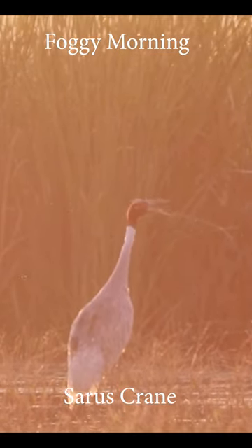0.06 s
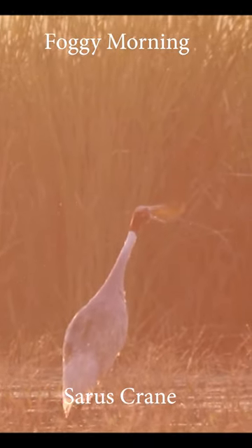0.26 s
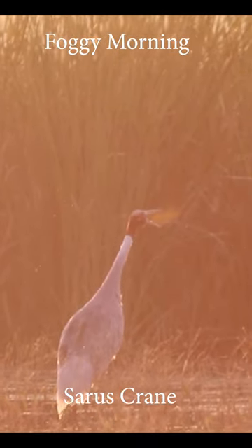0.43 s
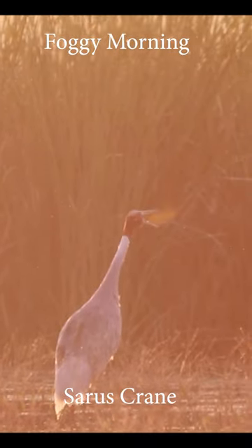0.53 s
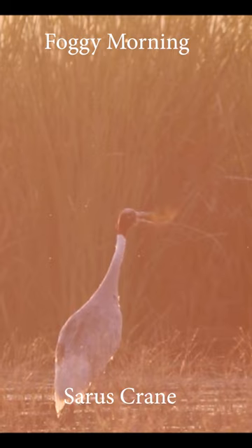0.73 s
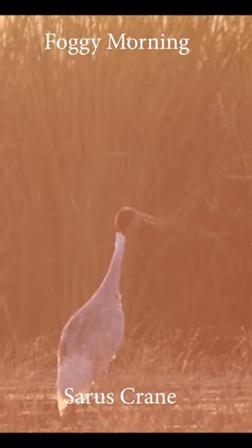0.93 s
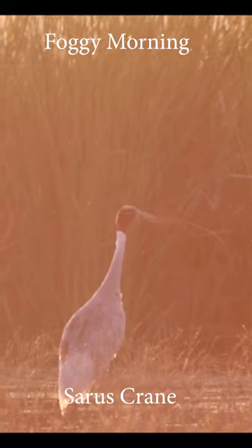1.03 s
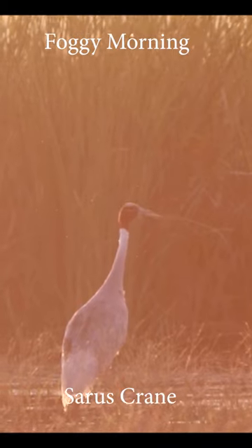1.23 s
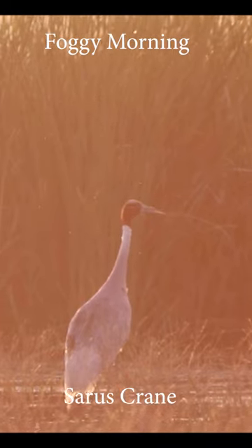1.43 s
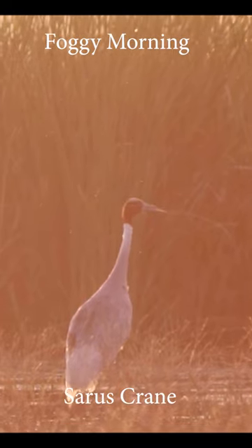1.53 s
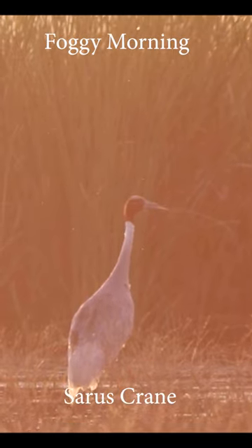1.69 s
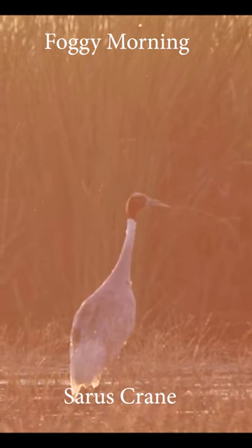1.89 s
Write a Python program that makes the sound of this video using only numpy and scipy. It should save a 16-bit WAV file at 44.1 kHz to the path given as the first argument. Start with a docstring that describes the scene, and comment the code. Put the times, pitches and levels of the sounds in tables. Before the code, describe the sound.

A crane gives one loud, harsh trumpeting call that ends in a rattle over a marsh.

```python
"""A low, steady rumble hangs over a marsh, and faint dry ticks come and go. A crane calls once:
a bugling note starts hoarse, scoops up and holds clean as its voice box rings. Then the voice breaks
into a harsh rattle, quick bursts of sharp snaps that sink in pitch and die away. Reeds, water and the
far bank scatter the call. As the echo fades, an insect chirps and small birds whistle far off."""
import sys
import numpy as np
from scipy import signal
from scipy.fft import rfft, irfft
from scipy.io import wavfile
from scipy.ndimage import uniform_filter1d

SR = 44100
rng = np.random.default_rng(int(sys.argv[2]) if len(sys.argv) > 2 else 0)


def generate_wav(signal):
    """Clip the signal to [-1, 1] and save it as 16-bit WAV at the path in sys.argv[1]."""
    frames = np.transpose(np.atleast_2d(signal))
    scaled = np.clip(frames, -1, 1) * 32767
    pcm = np.round(scaled).astype(np.int16)
    wavfile.write(sys.argv[1], SR, pcm)


N = 85995


def amp(db):
    """Turn decibels into a gain."""
    return 10 ** (np.asarray(db) / 20)


def unit(x):
    """Scale a signal to an average power of 1."""
    return x / np.sqrt(np.mean(x ** 2))


def curve(table, t):
    """Read a table's columns at times t, gliding from row to row."""
    rows = np.array(table, float)
    return [np.interp(t, rows[:, 0], column) for column in rows.T[1:]]


def level_at(table, hz):
    """Read a table's level in dB at hz, gliding evenly through each octave."""
    rows = np.array(table, float)
    return np.interp(np.log(np.maximum(hz, 1)), np.log(rows[:, 0]), rows[:, 1])


def shape(x, db_at):
    """Turn each frequency up or down by db_at(Hz)."""
    size = 2 ** 18
    hz = np.arange(size // 2 + 1) * SR / size
    cepstrum = irfft(np.log(amp(db_at(hz))))
    # make the filter ring after a sound, never before it
    cepstrum[1:size // 2] *= 2
    cepstrum[size // 2 + 1:] = 0
    return irfft(rfft(x, size) * np.exp(rfft(cepstrum)))[:N]


def colour(x, table):
    """Filter a sound by a table of frequencies and levels."""
    return shape(x, lambda hz: level_at(table, hz))


def wobble(rate):
    """A smooth random wobble of size 1 that turns about rate times a second."""
    hold = max(int(SR / rate), 2)
    steps = np.repeat(rng.standard_normal(N // hold + 1), hold)
    return unit(uniform_filter1d(steps, hold)[:N])


def gate(t, start, end, attack, release):
    """Fade in, hold until end, then die away; all in seconds."""
    return np.clip((t - start) / attack, 0, 1) * np.exp(-np.maximum(t - end, 0) / release)


def add_click(out, at, gain, size=8):
    """Place a click at an exact time, even between samples."""
    samples = np.arange(-size, size + 1) + int(at * SR)
    offset = samples - at * SR
    out[samples] += gain * np.sinc(offset) * np.sinc(offset / (size + 1))


# The background noise. Each row: frequency in Hz, relative level in dB.
AIR_COLOUR = [(25, -19), (60, -7), (130, -2), (200, -1), (270, 3), (400, -9), (700, -8), (1050, -13.5),
              (1400, -9), (1750, -9.5), (1930, -22), (2350, -11), (3100, -20), (3550, -19), (4500, -22),
              (5600, -29), (7500, -27.5), (10000, -31.5), (15500, -36)]

def air():
    """Distant rumble and soft hiss, wavering a little."""
    return amp(-48 + .3 * wobble(14.05)) * unit(colour(rng.standard_normal(N), AIR_COLOUR))


CHIRP_HZ, CHIRP_PULSES_PER_S = 6420, 54.3
# The insect's chirps. Each row: start in seconds, length in seconds.
INSECT_CHIRPS = [(1.082, .055), (1.235, 0.055), (1.393, .075)]

def insect(t):
    """An insect chirps in short runs of high, nearly pure pulses."""
    pulses = 0
    for at, length in INSECT_CHIRPS:
        beat = np.sin(np.pi * CHIRP_PULSES_PER_S * (t - at)) ** 2
        pulses += beat * gate(t, at, at + length, .004, .004)
    tone = np.sin(2 * np.pi * CHIRP_HZ * t + .5 * wobble(200))
    return amp(-60.5 + 2 * wobble(39.63)) * pulses * tone


# One list for each whistle. Each row: time in seconds, pitch in Hz, level in dB.
BIRD_WHISTLES = [
    [(1.205, 6400, -69), (1.235, 5890, -56), (1.25, 5050, -67), (1.268, 4500, -64)],
    [(1.503, 4960, -64), (1.518, 5090, -57), (1.535, 5060, -67)],
]

def small_birds(t):
    """Small birds give thin, short whistles, far off."""
    out = 0
    for whistle in BIRD_WHISTLES:
        hz, db = curve(whistle, t)
        phase = 2 * np.pi * np.cumsum(hz * (1 + .015 * wobble(400))) / SR
        out += amp(db) * np.sin(phase) * gate(t, whistle[0][0], whistle[-1][0], .008, .0067)
    return out


# The ticks. Each row: start in seconds, relative level in dB.
DRY_TICKS = [(0.045, -35), (0.1343, -41), (0.8814, -38.5), (1.0477, -41), (1.1105, -41.5), (1.1728, -38),
             (1.1911, -38.5), (1.4325, -41.5), (1.441, -39.5), (1.4875, -40), (1.6533, -39.5), (1.884, -39),
             (1.899, -41)]
# The tone of a tick. Each row: frequency in Hz, boost or cut in dB.
TICK_COLOUR = [(500, -12), (1500, 4), (4200, -1.5), (5800, -8.5), (7800, -4.5), (10500, -21), (15000, -28)]

def ticks(t):
    """Tiny bursts of noise make faint dry ticks, some in pairs."""
    level = sum(amp(db + 1) * gate(t, at, at + .0018, .0005, .0022) for at, db in DRY_TICKS)
    return colour(level * rng.standard_normal(N), TICK_COLOUR)


# The tone of the near and the far echoes. Each row: frequency in Hz, boost or cut in dB.
REED_COLOUR = [(400, -1), (1200, 2), (4000, 1), (7500, -5.5), (11000, 1)]
BANK_COLOUR = [(300, -2), (900, 5), (1300, 4.5), (2000, -4), (3000, -0.5), (6000, -8.5), (12000, -26)]

def echoes(call, t, tone, delay_s, fade_s):
    """Reeds, water or the far bank scatter the call into a cloud that drops 60 dB in fade_s."""
    tail = rng.standard_normal(N) * (t > delay_s) * np.exp(-np.log(1000) * t / fade_s)
    cloud = signal.fftconvolve(call, tail / np.linalg.norm(tail))[:N]
    return colour(cloud, tone)


# The tone under the rattle. Each row: time in seconds, pitch in Hz, level in dB,
# level of the octave above in dB, depth of the throb from 0 to 1.
SINKING_TONE = [(0.499, 1315, -26, -41, 0), (0.515, 1255, -27, -43, 0.5), (0.535, 1190, -33.5, -47, 0.4),
                (0.565, 1179, -30, -45, 0.63), (0.605, 1151, -31, -41, 0.62), (0.645, 1095, -33, -44, 0.73),
                (0.695, 1040, -39, -48, 0.79), (0.745, 880, -46, -49, 0.98), (0.80, 723, -46.5, -45, 0.94),
                (0.845, 572, -50.5, -55, 1)]

def undertone(t):
    """The note's lowest tone sinks on through the rattle; the deeper it throbs, the rougher it gets."""
    hz, db, octave_db, depth = curve(SINKING_TONE, t)
    start, end = SINKING_TONE[0][0], SINKING_TONE[-1][0]
    phase = 2 * np.pi * np.cumsum(hz * (1 + .028 * depth ** 2 * wobble(200))) / SR
    tone = amp(db) * np.sin(phase) + amp(octave_db) * np.sin(2 * phase)
    flutter_hz = curve(RATTLE_BURSTS, t)[0]  # shared with the rattle below
    cycles = np.cumsum(flutter_hz * (t > start)) / SR
    throb = 1 + depth * np.cos(2 * np.pi * (cycles - .41))  # peaks 0.41 of the way into each cycle
    return throb * tone * gate(t, start, end, .006, .0076)


SLOW_START, SPEED_UP_S = .36, .0023  # a burst starts with wider gaps between snaps, then tightens
KNOCK_FROM_S, KNOCK_GROW_S = .714, .093
# The rattle. Each row: time in seconds, bursts per second, snaps per second reached in a burst,
# share of the cycle that the airway is open, relative level in dB.
RATTLE_BURSTS = [(0.4988, 80.6, 1150, 0.23, -2), (0.511, 76, 1229, .42, 0), (0.545, 76.4, 1297, .48, -1),
                 (0.62, 76.4, 1315, .47, -2.5), (0.69, 76, 1159, .46, -2.5), (0.712, 70.5, 1113, .40, -4.5),
                 (0.765, 68.7, 973, 0.34, -5.5), (0.797, 67, 876, 0.38, -9.5), (0.826, 62, 755, 0.2, -14.5)]
# A snap through the windpipe and open bill, and the soft knock left as the pressure runs out.
# Each row: frequency in Hz, boost or cut in dB.
SNAP_COLOUR = [(300, -51), (620, -17), (1030, -4.5), (1400, -4), (1800, 0), (3000, -5.5), (5000, -0.5),
               (6300, 2), (8200, -2), (10000, -9.5), (12000, -23.5), (15500, -39)]
KNOCK_COLOUR = [(300, -42), (650, -5), (1100, -13.5), (1600, 0), (2200, -7), (2700, -3.5), (4000, -14),
                (10000, -27)]

def rattle():
    """A slow flutter opens and shuts the airway; while it is open the membranes snap ever faster."""
    snaps, knocks = np.zeros(N), np.zeros(N)
    start = RATTLE_BURSTS[0][0]
    while start < RATTLE_BURSTS[-1][0] + .004:
        flutter_hz, snap_hz, open_share, db = curve(RATTLE_BURSTS, start)
        snap_hz *= 1 + .015 * rng.standard_normal()
        knock_gain = amp(db / 2) * np.clip((start - KNOCK_FROM_S) / KNOCK_GROW_S, 0, 1)
        age, length = 0, open_share / flutter_hz
        for late, loud in rng.standard_normal((12, 2)):
            if age > length:
                break
            edge_db = -4.5 * (2 * age / length - 1) ** 2  # softer at both ends of the burst
            add_click(snaps, start + age, -amp(db + edge_db + .5 * loud))
            add_click(knocks, start + age, -knock_gain)
            age += (1 + SLOW_START * np.exp(-age / SPEED_UP_S) + .026 * late) / snap_hz
        start += 1 / flutter_hz
    return amp(5.5) * colour(snaps, SNAP_COLOUR) + amp(-1.5) * colour(knocks, KNOCK_COLOUR)


HOARSE_S, RASP_S = .032, .017  # how quickly the rough start settles
DIP_HZ, DIP_WIDTH_HZ, DIP_DB, BILL_OPEN_S = 6780, 850, -13, .313  # treble dip until the bill is open
# The note. Each row: time in seconds, pitch in Hz, relative level in dB, brightness in dB per octave.
BUGLE_NOTE = [(0.231, 945, -33, 1.5), (0.240, 1092, -34.5, 0), (0.245, 1156, -28.5, -1.5),
              (0.255, 1261, -27, -0.5), (0.274, 1288, -25.5, 1.5), (0.281, 1394, -27, 1.5),
              (0.298, 1400, -27, 1), (0.316, 1420, -25.5, -0.5), (0.340, 1430, -24, -0.3),
              (0.368, 1407, -27.5, 0), (0.392, 1373, -28.5, 0), (0.445, 1345, -28, -2),
              (0.499, 1328, -25.5, -3)]
# The note's harmonics, and the air hissing through it. Each row: frequency in Hz, relative level in dB.
HARMONIC_COLOUR = [(1000, 1.5), (1400, 0.5), (2700, -4.5), (4100, -6), (5600, -12), (6400, -10.5),
                   (7100, -8.5), (8400, -12), (9400, -33.5), (11500, -38), (15000, -46)]
RASP_COLOUR = [(400, -10), (800, -9), (1500, 2), (3000, -5), (5000, 3), (6500, -1), (7700, -4), (9500, -8),
               (12000, -30), (15500, -28)]

def bugle(t):
    """The voice box rings: hoarse for a moment, then a clean stack of harmonics (pitch multiples)."""
    hz, db, brightness = curve(BUGLE_NOTE, t)
    start, end = BUGLE_NOTE[0][0], BUGLE_NOTE[-1][0]
    age = np.maximum(t - start, 0)
    hoarse = np.exp(-age / HOARSE_S)
    hz *= 1 + .0007 * wobble(350) + .018 * hoarse * wobble(600)
    phase = 2 * np.pi * np.cumsum(hz) / SR
    bill_shut = np.clip((BILL_OPEN_S - t) / .021, 0, 1)
    voice = 0
    for k in range(1, 12):
        harmonic_db = level_at(HARMONIC_COLOUR, k * hz) + brightness * np.log2(k)
        flicker_db = (.2 * k + 4 * hoarse) * wobble(180)
        dip_db = DIP_DB * bill_shut * np.exp(-((k * hz - DIP_HZ) / DIP_WIDTH_HZ) ** 2)
        voice -= amp(harmonic_db + flicker_db + dip_db) * np.cos(k * phase)
    puffs = rng.standard_normal(N) * (1 + np.cos(phase))  # one puff of air for each vibration
    rasp = unit(colour(puffs, RASP_COLOUR))
    voice += rasp * (amp(-27) + amp(-8) * np.exp(-age / RASP_S))
    level = amp(db + 2.5 * hoarse * wobble(300))
    return voice * level * gate(t, start, end, attack=.0017, release=.0068)


def scene():
    """The crane's call, its echoes near and far, and the marsh around it."""
    t = np.arange(N) / SR
    call = bugle(t) + rattle() + undertone(t)
    near = amp(-8.5) * echoes(call, t, REED_COLOUR, delay_s=.00072, fade_s=.08)
    far = amp(-20) * echoes(call, t, BANK_COLOUR, delay_s=.014, fade_s=1.7)
    return (call + near + far + ticks(t) + small_birds(t) + insect(t) + air())[None]


TOP_HZ = 15750
# The microphone's rings and hollows. Each row: frequency in Hz, width in Hz, boost or cut in dB.
MIC_BANDS = [(260, 50, 4), (580, 70, 5), (1420, 110, 3), (2150, 150, -3), (2420, 150, 2), (2850, 110, 4),
             (3080, 300, -4), (3600, 180, 3), (4260, 150, 4), (4660, 150, -6), (4920, 140, 3),
             (6700, 150, -5), (7480, 200, 6), (7700, 80, -6), (7850, 170, 3)]

def record(dry):
    """The microphone lifts or lowers narrow bands, and the highest treble is cut."""
    def mic_db(f):
        return sum(db / (1 + (2 * (f - hz) / width) ** 2) for hz, width, db in MIC_BANDS)

    treble_cut = signal.ellip(10, .2, 80, TOP_HZ, fs=SR, output="sos")
    return signal.sosfilt(treble_cut, shape(dry[0], mic_db))[None]


dry = scene()
out = record(dry)
generate_wav(out)
```